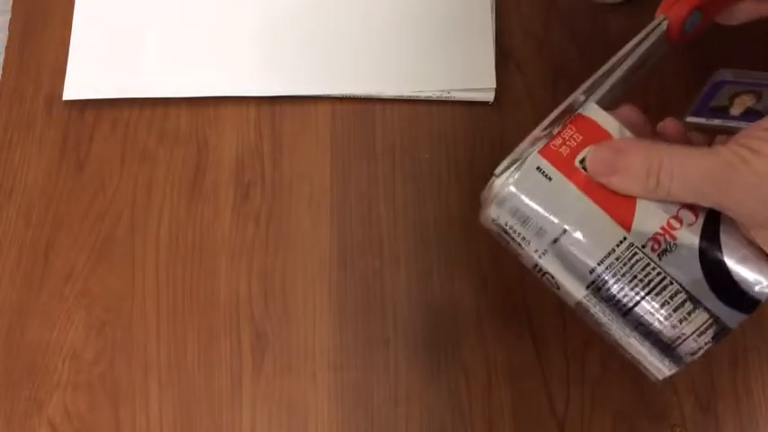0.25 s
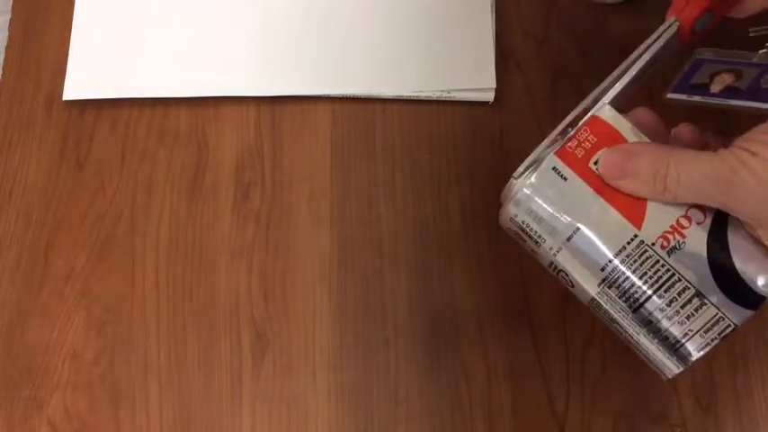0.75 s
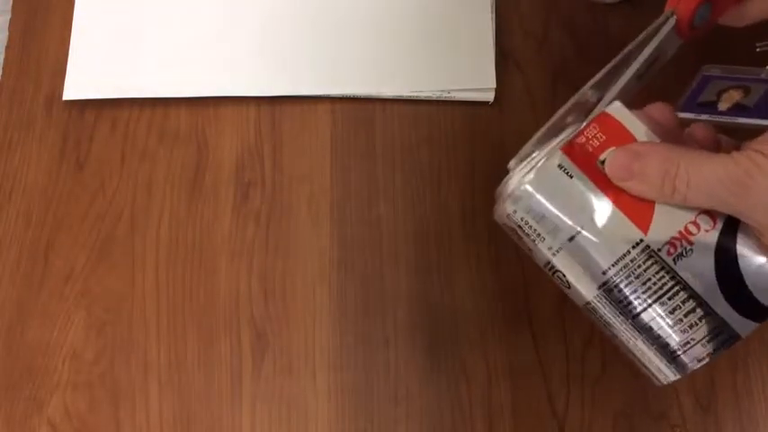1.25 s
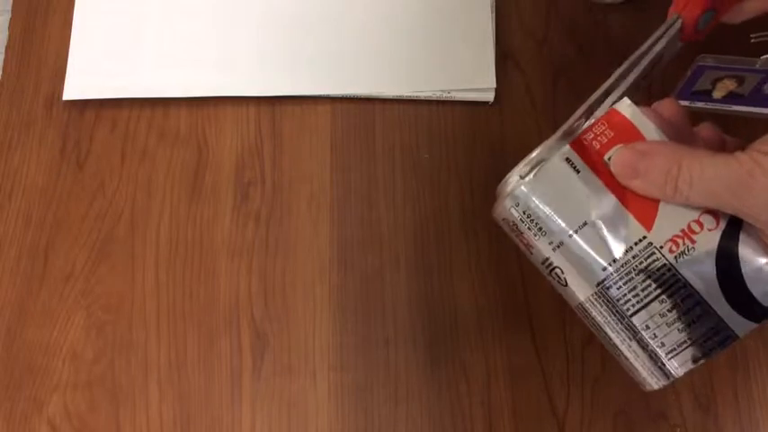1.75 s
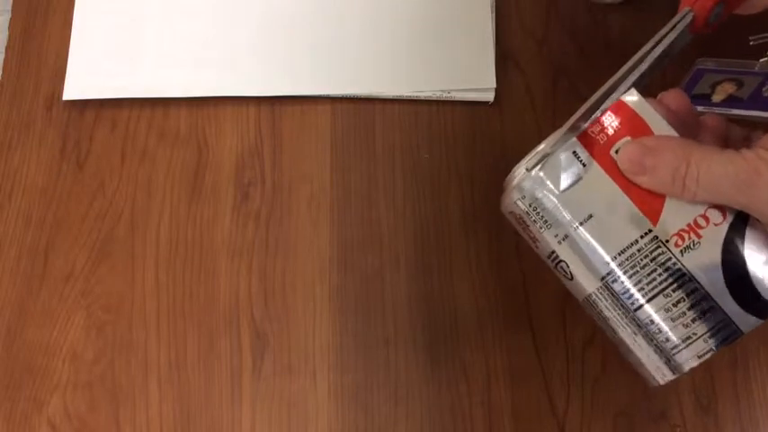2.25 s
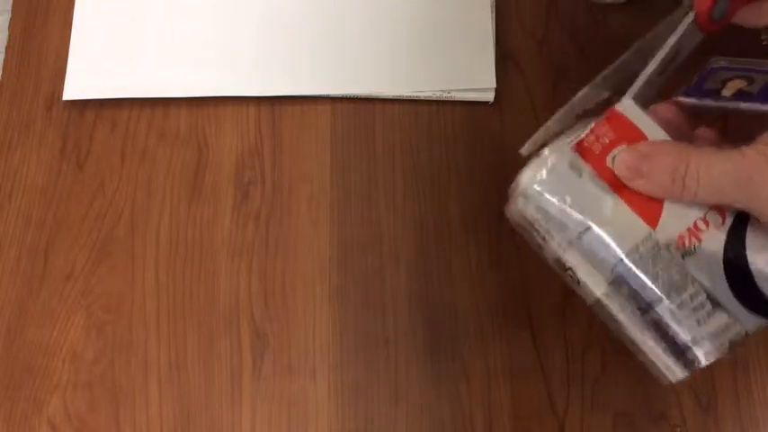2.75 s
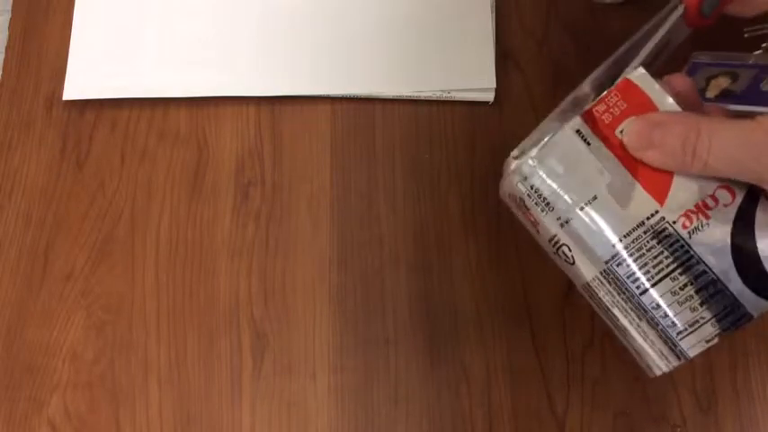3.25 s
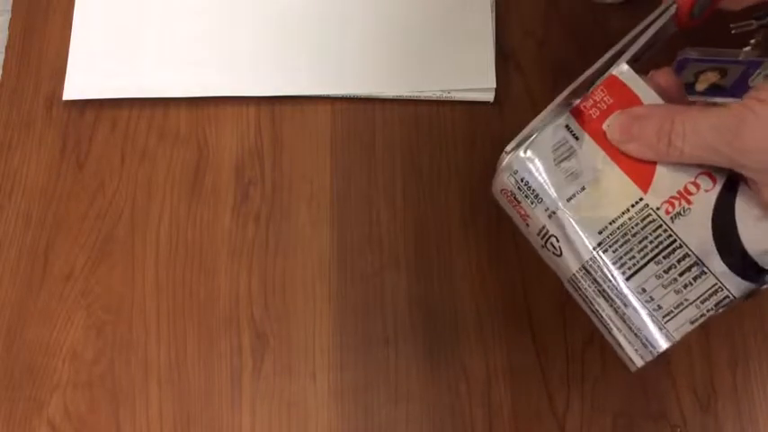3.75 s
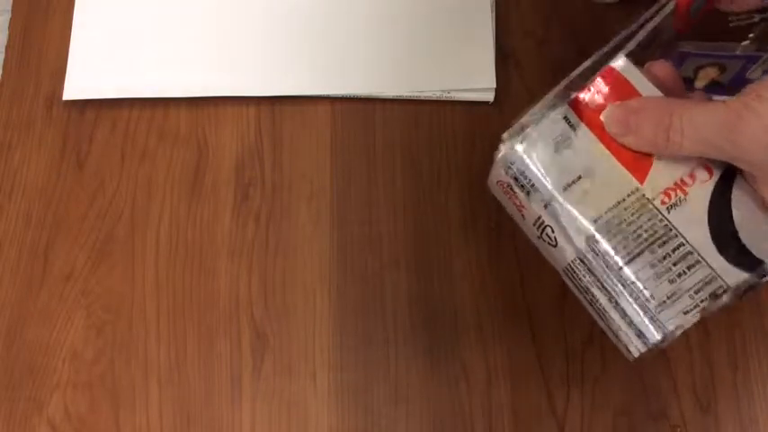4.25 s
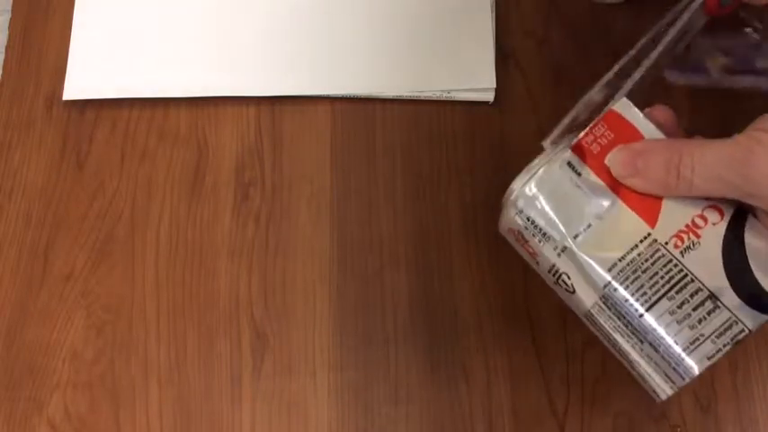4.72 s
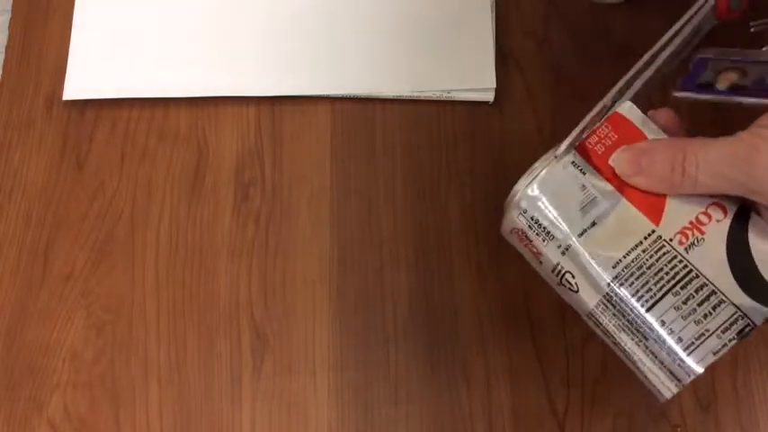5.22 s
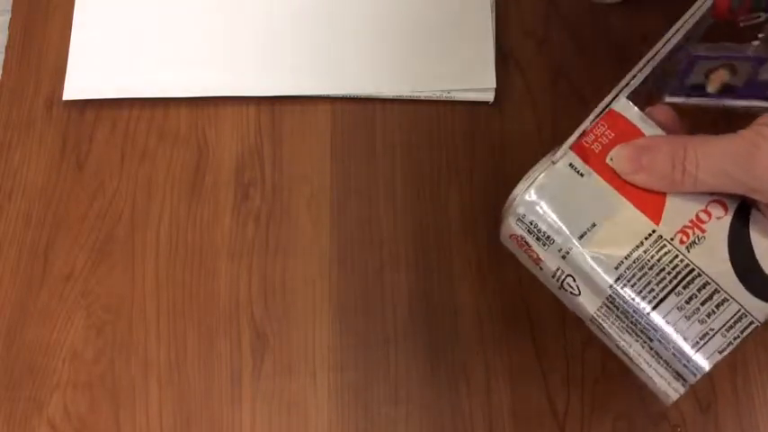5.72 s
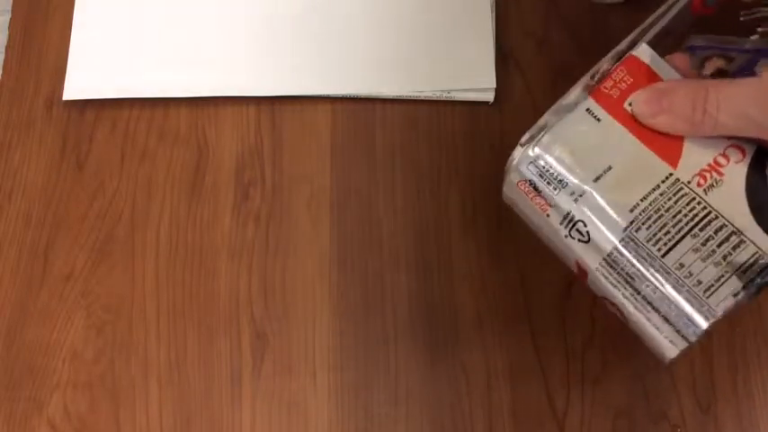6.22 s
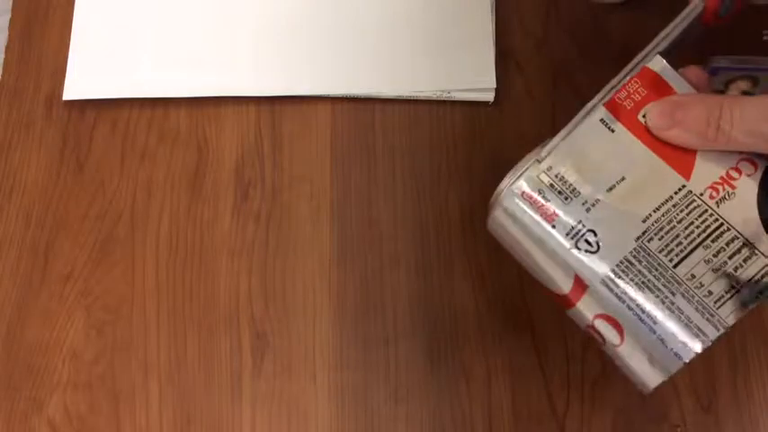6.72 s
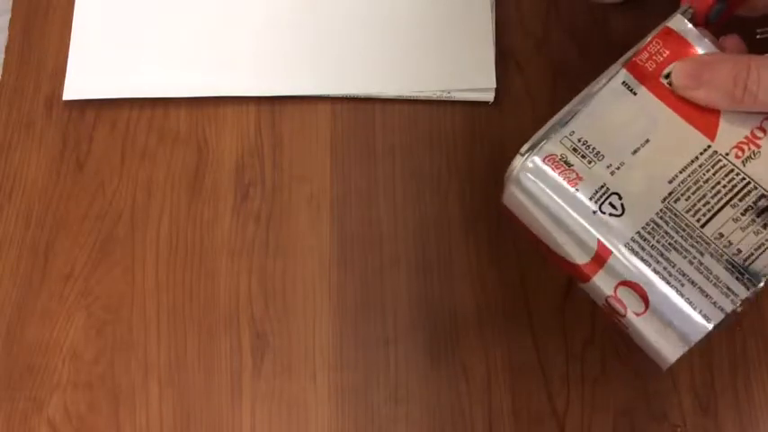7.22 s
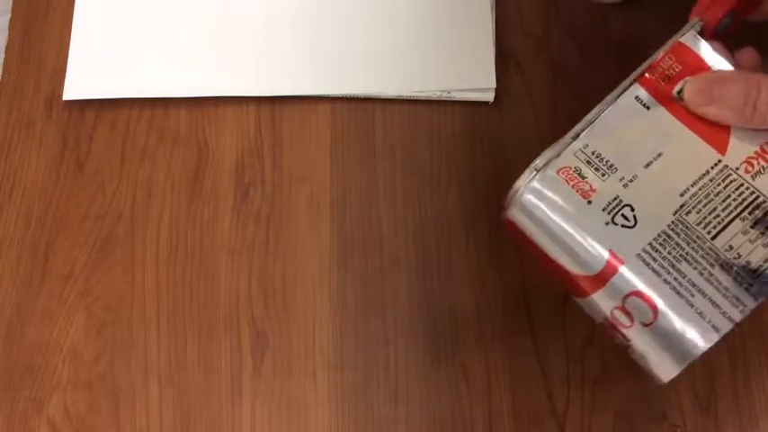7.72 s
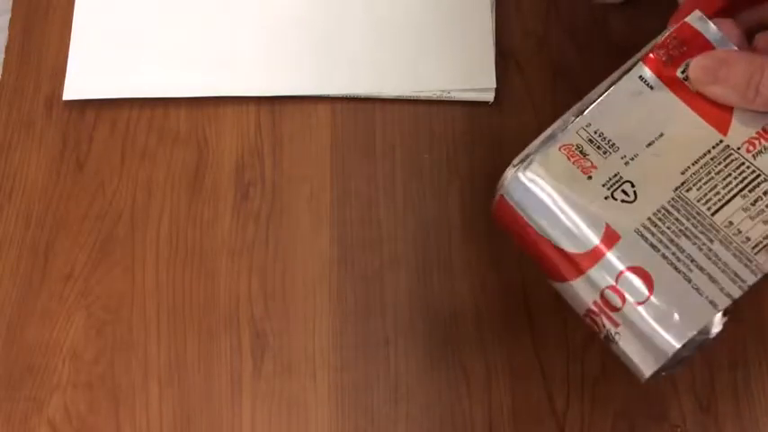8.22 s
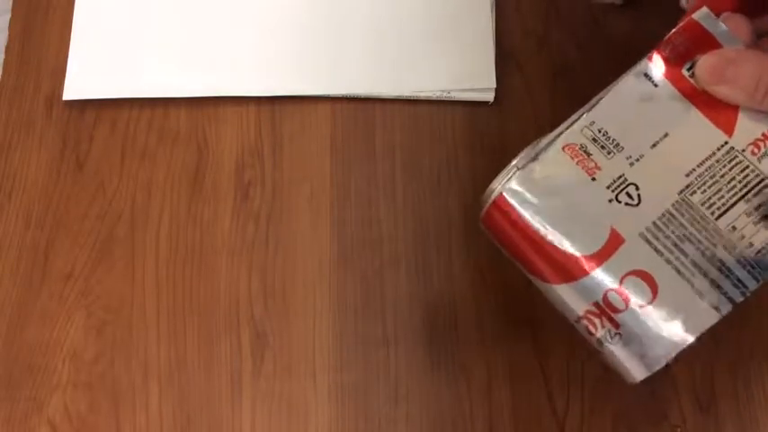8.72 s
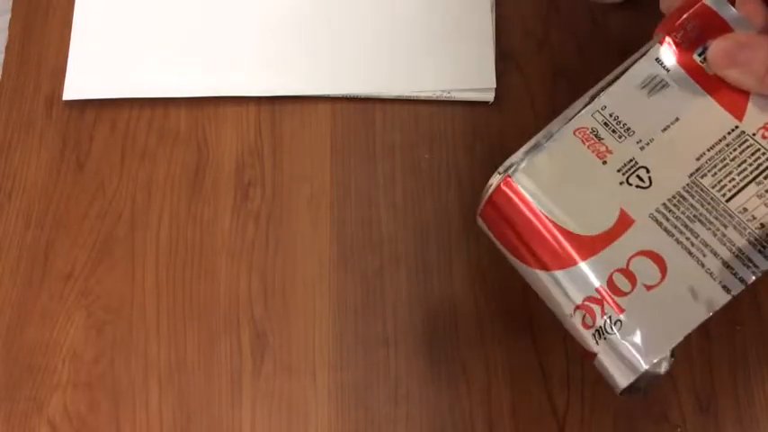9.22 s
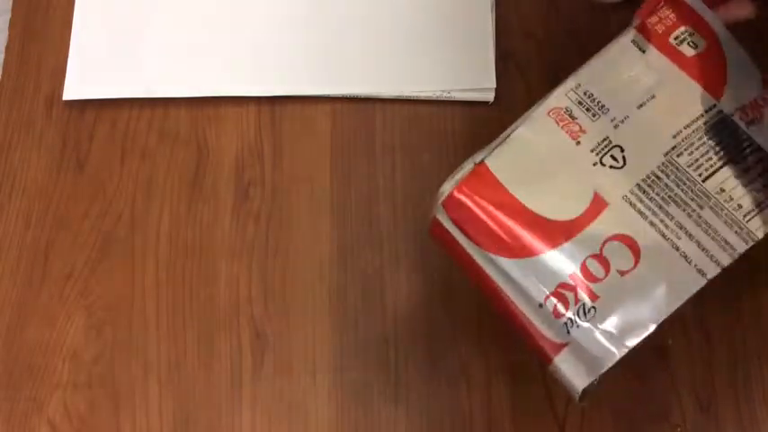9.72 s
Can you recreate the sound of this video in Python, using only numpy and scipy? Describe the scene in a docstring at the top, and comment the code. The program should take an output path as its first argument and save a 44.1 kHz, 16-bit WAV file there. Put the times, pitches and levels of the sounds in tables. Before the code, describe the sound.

Scissors cut a thin aluminium drink can, heard close up in a quiet room over a faint, steady ventilation rumble. Each cut is a sharp metallic snap with a brief crackle and a hollow, tinny ring. After a few tiny ticks, a loud snap comes at 0.6 seconds, followed by soft crinkles. More strong snaps land at about 2.3, 2.7, 3.7, 4.4, 5.6 and 6.6 seconds, with weaker buckling pops, blade ticks and short scrapes scattered between them. From about 7 seconds the hollow tone rises slightly, and the cuts become longer, duller crunches with more rasping, clustering around 7.6, 8.4, 8.8 and 9.4 seconds. One more sharp snap comes near 9.8 seconds. The wooden table adds soft, dull thuds under the cuts, with low bumps near 2.3, 6.6 and 7.6 seconds.

```python
"""Scissors cutting a drink can

Scissors work round a thin aluminium can held over a wooden table in a quiet room. The sheet tears
and buckles in snaps; the blades scrape and tick along the cut edge. These forces sound the sheet, the
air hollow of the open can and the table, which the hand also jolts. Ventilation rumbles below."""
import sys
import numpy as np
from scipy import signal
from scipy.fft import rfft, irfft
from scipy.io import wavfile
from scipy.ndimage import uniform_filter1d

SR = 44100
rng = np.random.default_rng(int(sys.argv[2]) if len(sys.argv) > 2 else 0)


def generate_wav(sig):
    """Save sig (samples, or channels by samples) to the path in sys.argv[1] as 16-bit PCM at SR."""
    pcm = np.round(np.clip(np.atleast_2d(sig).T, -1, 1) * 32767).astype(np.int16)
    wavfile.write(sys.argv[1], SR, pcm)


N = 439677

# Snaps of the sheet: break_s, sheet_db, hollow_db, thud_db, hollow_pitch_hz, flap_pitch_hz
SNAPS = [(0.034, -59.5, -76, -65, 855, 6400), (0.144, -80, -66.0, -66, 990.0, 3100.0),
         (0.172, -79, -63, -75, 990.0, 3160), (0.221, -66, -67, -71, 940, 2650.0),
         (0.444, -79, -68, -72.0, 960, 3100), (0.609, -17, -32.5, -63, 1236, 6280),
         (1.17, -43.5, -51.5, -56.5, 1022, 5150), (1.19, -51.5, -50.5, -68, 1030, 4350.0),
         (1.47, -60.0, -59.5, -63, 1320.0, 4000.0), (1.531, -78.0, -60.5, -79, 886, 3120),
         (1.551, -42, -60, -60, 1434, 3174), (1.663, -56.5, -52, -47.5, 923, 3800),
         (2.34, -29.0, -37.5, -32, 994, 6420), (2.654, -44, -48, -47.5, 1260, 4050),
         (2.714, -20, -27.5, -41, 1220, 3970), (2.789, -59, -59, -76, 965.0, 3100.0),
         (2.819, -57, -56, -70, 920, 5250.0), (2.881, -62, -59.5, -65, 1006, 3280),
         (2.965, -53, -62, -56, 1020, 3330), (2.982, -43, -65, -73, 1040, 4970),
         (3.008, -39.5, -64, -70.0, 1040, 4830), (3.025, -42.5, -67, -80, 1000, 4900),
         (3.065, -72, -64, -74, 1315.0, 3250.0), (3.094, -62.0, -56, -76, 1028, 5870),
         (3.248, -72.5, -66, -68, 985.0, 3050.0), (3.321, -59.5, -45.5, -60.5, 1003, 2200.0),
         (3.712, -24.0, -29.5, -62.5, 1150, 3340), (3.755, -45.5, -37.0, -46.0, 990, 4000),
         (3.841, -59, -43.5, -52, 995, 2750.0), (4.072, -61.5, -36.5, -53.5, 945, 2450),
         (4.271, -65.5, -47, -67.5, 1015.0, 2290), (4.385, -28.5, -25, -61, 1090, 4930),
         (4.407, -53.0, -37, -50, 976, 3170), (4.459, -69, -51, -60, 1030, 3120),
         (4.503, -77, -65.0, -67, 1025.0, 3860), (4.722, -78, -74, -73.5, 1010.0, 3400.0),
         (4.771, -73, -65.5, -64, 997, 2266), (4.934, -77.5, -59.5, -69.5, 1005, 3800.0),
         (4.965, -78, -61.5, -72, 1006, 2200.0), (5.33, -50.5, -39, -50.5, 1020, 2520),
         (5.347, -67.5, -51, -70.5, 1045.0, 2500.0), (5.391, -46.0, -36.5, -55, 963, 3600.0),
         (5.628, -27, -26, -34, 1034, 5220), (5.918, -68.5, -79.5, -68, 995, 3160),
         (5.926, -53.5, -53, -74, 1095.0, 3500.0), (6.025, -59.5, -55, -70, 1105.0, 3480),
         (6.046, -52, -47, -54, 940.0, 3310), (6.092, -61, -37, -79, 920, 2235),
         (6.245, -77, -61.0, -56, 960.0, 3150.0), (6.301, -49.5, -31, -71.5, 1096, 3930),
         (6.32, -72, -54.5, -72, 1048, 3900.0), (6.568, -66, -55.5, -58.5, 1206, 5350.0),
         (6.619, -34, -27, -36.5, 1116, 4460), (6.636, -36, -41, -42, 1110, 6500),
         (6.665, -53, -50, -50, 1250, 6600), (6.947, -47.5, -50.5, -52.5, 1107, 2740),
         (6.979, -42.5, -63, -54, 1231, 4380), (7.212, -64, -63, -64, 1113, 2800.0),
         (7.264, -65, -65.5, -63, 1217, 2160), (7.398, -79, -70.0, -51.5, 1030.0, 2160),
         (7.537, -76, -61.5, -66.5, 1050.0, 2870), (7.554, -50, -50.5, -51.5, 1200, 2560),
         (7.621, -41.5, -41.5, -35.5, 1400, 2800.0), (7.626, -37, -29.5, -56, 1238, 3220),
         (7.678, -58, -47.5, -47.5, 1290, 3950), (7.934, -52, -50.5, -50.5, 1220, 3900),
         (8.192, -59.5, -59, -62, 1045.0, 4250.0), (8.206, -56.5, -55.5, -52.5, 1490, 3000),
         (8.369, -41.5, -42, -41, 1295.0, 3830), (8.379, -44.0, -39, -40, 1335, 3700),
         (8.553, -66, -77, -73.5, 990, 5300), (8.79, -49, -49.5, -57, 1425.0, 4300.0),
         (8.822, -44.5, -52, -55.0, 1430.0, 2970), (8.839, -43, -37, -36, 1390, 2250),
         (8.924, -67, -55, -63, 1438, 4110), (9.189, -69, -62.5, -50.5, 1393, 4150.0),
         (9.351, -37, -36.5, -39.5, 1410, 3080), (9.382, -46, -54, -35, 1440, 4250),
         (9.413, -38.0, -36, -60, 890, 2680), (9.492, -62, -53.5, -55, 1420, 3020),
         (9.588, -64, -42.5, -45.5, 960, 2850), (9.845, -28.0, -35, -54, 1270, 4900)]
LEAD_SAMPLES = 20   # crackle starts ahead of the break


def can():
    """Cutting forces drive the air hollow, the sheet, the blades and the table."""
    scrape = scrape_forces()
    air, wall, treble, thud = snap_forces() + scrape + tick_forces()
    return hollow(air) + sheet(wall, treble) + blades(scrape[1]) + table_thud(thud)


def snap_forces():
    """Each snap is a break, a dying crackle and a longer shiver. Rows: hollow, sheet, treble, thud."""
    # Crackle lengthens and dulls as the strip comes free: time_s, t60_s, treble_re_sheet_db, break_db
    strip = [(0, 0.056, -3, 13), (2.4, .035, 0, 11), (4.4, 0.041, -1.5, 10.5), (6.0, 0.06, -2.5, 12.5),
             (7.6, 0.078, -3, 7), (9.97, 0.12, -5.5, 4)]
    strip_s, *strip_columns = np.transpose(strip)
    shiver_t60_s = np.array([[0.2], [0.2], [0.14], [0.2]])
    push_db = np.array([5.5, 0, 0, 5.5])   # the break shoves air and table hardest
    out, size = np.zeros((4, N + SR)), SR // 4
    t = np.arange(size) / SR
    for break_s, sheet_db, hollow_db, thud_db, _, _ in SNAPS:
        t60_s, tilt_db, break_db = (np.interp(break_s, strip_s, column) for column in strip_columns)
        pop_db = max(hollow_db - sheet_db, 0)   # a hollow pop is a soft buckle: duller, cleaner
        hard_db = max(sheet_db + 40, 0)   # hard snaps also break more cleanly
        treble_db = sheet_db + tilt_db - 0.35 * pop_db
        crackle = grains(size, per_s=9800, spread_db=5.5)
        crackle *= from_db(-60 * t / t60_s) * np.minimum(t / 0.0011, 1)
        finger_damping_db = 1.2 * wander(size, window=400)
        shiver = from_db(-16.5 - 60 * t / shiver_t60_s + finger_damping_db)
        bursts = crackle + rng.standard_normal(size) * shiver   # crumpled wall: new, dense modes
        bursts[:, LEAD_SAMPLES] += from_db(break_db + 0.16 * hard_db + 0.3 * pop_db + push_db)
        cut_hz = np.clip(19000 * 2 ** (-0.082 * pop_db), 500, 18000)
        bursts[1] = signal.lfilter(*signal.butter(2, cut_hz, fs=SR), bursts[1])
        bursts /= np.sqrt(np.mean(bursts[:, :SR // 100] ** 2, axis=1, keepdims=True))
        i = round(break_s * SR) - LEAD_SAMPLES
        out[:, i:i + size] += from_db([hollow_db, sheet_db, treble_db, thud_db])[:, None] * bursts
    return out[:, :N]


def scrape_forces():
    """A blade rasps on the burred edge under each stroke's pressure. Rows as in snap_forces."""
    # Blade strokes: full_pressure_s, closing_s, held_s, sheet_db, hollow_db, thud_db
    strokes = [(0.01, 0.06, 0.075, -63, -61, -66), (.175, 0.033, 0.059, -68.5, -57.5, -79),
               (1.178, 0.014, 0.09, -78, -66.5, -60), (1.47, .01, 0.29, -68, -65, -64),
               (2.646, .012, 0.027, -49.5, -48.5, -54), (2.98, 0.035, 0.029, -45, -57, -76),
               (3.12, 0.033, 0.19, -72.5, -72.5, -75), (4.719, 0.15, .27, -75.5, -69.5, -75),
               (6.053, 0.034, 0.012, -52, -43, -52.5), (6.977, 0.05, 0.043, -44.5, -54.5, -59),
               (7.222, 0.035, 0.022, -71, -65, -66.5), (7.556, .02, 0.015, -62, -59.5, -62),
               (7.947, 0.017, 0.047, -49.5, -45.5, -46.5), (8.202, 0.041, 0.0041, -64, -65.5, -58),
               (8.386, 0.028, 0.026, -48.5, -46, -40.5), (8.794, 0.0084, 0.19, -54, -53, -52.5),
               (9.164, 0.017, 0.1, -72, -68.5, -77), (9.359, 0.013, 0.017, -55.5, -39, -42.5),
               (9.426, 0.065, 0.0041, -45, -39, -44.5), (9.601, 0.022, 0.15, -44.5, -49.5, -47.5),
               (9.842, 0.12, .005, -48.5, -62, -55), (9.853, 0.011, 0.007, -35, -39, -52),
               (9.91, 0.022, 0.092, -93, -77, -66)]
    closing_db, sag_db_per_s, release_db_per_s = 30, 88.5, 378
    out, t = np.zeros((4, N)), np.arange(N) / SR
    burrs_db = 2.2 * wander(N, window=150)
    rasp = rms_one(grains(N, per_s=8000, spread_db=2.5) * from_db(burrs_db))
    for full_s, closing_s, held_s, sheet_db, hollow_db, thud_db in strokes:
        on = abs(t - full_s) < 0.5
        age_s = t[on] - full_s
        pressure = from_db(closing_db / closing_s * np.minimum(age_s, 0)
                           - sag_db_per_s * np.clip(age_s, 0, held_s)
                           - release_db_per_s * np.maximum(age_s - held_s, 0))
        treble_db = sheet_db - 4 - 0.19 * (sheet_db + 38)   # lighter strokes are brighter
        out[:, on] += from_db([hollow_db, sheet_db, treble_db, thud_db])[:, None] * pressure
    return out * rasp


def tick_forces():
    """The blades bite or slip in brief bursts of grains. Rows as in snap_forces."""
    # Faint blade ticks: start_s, level_db
    ticks = [(0.585, -63.5), (0.597, -58), (0.945, -77.5), (3.611, -63), (3.692, -67.5), (3.703, -56),
             (4.284, -64), (4.361, -65), (4.374, -64.5), (4.847, -77), (4.864, -66.5), (4.991, -67),
             (5.383, -48), (5.619, -47.5), (6.612, -43), (7.92, -78), (8.352, -76)]
    out, size, t60_s = np.zeros(N), SR // 50, 0.033
    decay_db = 60 * np.arange(size) / SR / t60_s
    for start_s, level_db in ticks:
        i = round(start_s * SR)
        out[i:i + size] += grains(size, per_s=18000, spread_db=2.5) * from_db(level_db - decay_db)
    return out * from_db([[0.5], [0], [-2], [-12]])


def sheet(wall, treble):
    """The thin wall radiates broadband crackle, a flap resonance and two longer rings."""
    # Wall spectrum: freq_hz, density_db
    spectrum = [(940, -38), (1600, -14), (1810, -8.5), (2380, -9), (3080, -1.5), (4400, -2), (5130, -3),
                (6530, -1), (7620, -2.5), (9880, -6), (14100, -15.5), (15500, -24), (16000, -33.5)]
    # Rings that outlast the crackle: freq_hz, level_db, t60_s
    ring_modes = [(3010, -4.5, 0.085), (6000, -1.5, 0.13)]
    # Free flap beside the cut: pitch_ratio, width_hz, level_db
    flap_modes = [(1.0, 200, -7)]
    # Flap at rest: time_s, pitch_hz
    flap_rest = [(0, 3133), (9.97, 3126)]
    crossover_hz = 7000
    body = through(wall, response(spectrum, hi_hz=crossover_hz))
    sizzle = through(treble, response(spectrum, lo_hz=crossover_hz))
    flap = resonate(wall, flap_modes, flap_rest, pitch_column=5, cut_hz=9000)
    return body + sizzle + flap + through(wall, ringing(ring_modes, level_db=-24))


def hollow(force):
    """The air in the open can resonates at a pitch set by the can's shape."""
    # Air modes: pitch_ratio, width_hz, level_db
    modes = [(0.767, 150, -3.5), (0.999, 161.1, 7.5), (1.079, 88.85, -8), (1.28, 161.6, -10),
             (1.6, 600, -14.5)]
    # Hollow at rest: time_s, pitch_hz
    rest = [(0, 997), (6.4, 1022), (7.0, 1233), (8.2, 1300), (8.8, 1310), (9.97, 1377)]
    return resonate(force, modes, rest, pitch_column=4, cut_hz=2260)


def resonate(force, modes, rest, pitch_column, cut_hz):
    """Resonances jump to each snap's pitch, then back to rest as the can springs into shape."""
    # The cut opens the can and damps it: time_s, width_factor
    opening = [(0, 1.1), (8.2, 0.83), (9.0, 3.44), (9.97, 3.4)]
    settle_s, lead_s = 0.035, LEAD_SAMPLES / SR
    force = signal.sosfilt(signal.butter(2, cut_hz, fs=SR, output="sos"), force + 1e-18)
    pitches = [(0.0039, rest[0][1])]   # start_s, pitch_hz
    breaks_s = [snap[0] for snap in SNAPS]
    for snap, break_s, next_s in zip(SNAPS, breaks_s, breaks_s[1:] + [N / SR]):
        pitches.append((break_s - lead_s, snap[pitch_column]))
        if break_s + settle_s < next_s - lead_s:
            pitches.append((break_s + settle_s, np.interp(break_s, *np.transpose(rest))))
    edges = [round(start_s * SR) for start_s, _ in pitches] + [N]
    out = np.zeros(N)
    for k, (ratio, width_hz, level_db) in enumerate(modes):
        state = np.zeros(2)
        for (start_s, pitch_hz), i, j in zip(pitches, edges, edges[1:]):
            radius = np.exp(-np.pi * width_hz * np.interp(start_s, *np.transpose(opening)) / SR)
            b = np.sqrt((1 - radius ** 2) / 2) * np.array([1, 0, -1])   # unit noise gain
            a = [1, -2 * radius * np.cos(2 * np.pi * ratio * pitch_hz / SR), radius ** 2]
            part, state = signal.lfilter(b, a, force[i:j], zi=state)
            out[i:j] += (-1) ** k * from_db(level_db) * part
    return out


def blades(friction):
    """The blades ring briefly under friction."""
    # Blade modes: freq_hz, level_db, t60_s
    modes = [(2980, -8, 0.009), (4160, 6.5, 0.02), (5280, 1.5, .025), (7090, -3.5, 0.016),
             (10100, 3, 0.018)]
    return through(friction, ringing(modes, level_db=-7))


def table_thud(force):
    """The wooden table answers the cutting with a dull thud."""
    # Thud spectrum: freq_hz, density_db
    spectrum = [(22, -22), (50, -13.5), (100, -7), (200, -5.5), (350, 5), (550, -2), (720, 3), (1100, -14),
                (1600, -50)]
    return through(force, response(spectrum))


def table_bumps():
    """The hand jolts the table top into a low, quickly damped swing."""
    # Jolts: start_s, peak_db
    jolts = [(2.34, -49.5), (6.62, -48), (7.63, -42), (8.379, -59)]
    pitch_hz, t60_s = 101, 0.21
    out, t = np.zeros(N), np.arange(N) / SR
    for start_s, peak_db in jolts:
        age_s = np.maximum(t - start_s, 0)
        out += from_db(peak_db - 60 * age_s / t60_s) * np.sin(2 * np.pi * pitch_hz * age_s)
    return out


def room_and_hollow_tail(direct):
    """Short room reflections, plus the can's hollow ringing on near 1 kHz."""
    # Tail bands: centre_hz, t60_s, level_db
    bands = [(306, 0.033, -5.5), (1080, 1, -23), (3000, 0.33, -16.5), (6360, 0.36, -16.5),
             (11100, 0.23, -9), (14500, .22, -16.5)]
    t = np.arange(SR // 2) / SR
    white, impulse = rng.standard_normal(len(t)), 0
    centres_hz = [band[0] for band in bands]
    edges_hz = [60, *np.sqrt(np.multiply(centres_hz[1:], centres_hz[:-1])), 18000]
    for (_, t60_s, level_db), lo_hz, hi_hz in zip(bands, edges_hz, edges_hz[1:]):
        noise = signal.sosfilt(signal.butter(3, [lo_hz, hi_hz], "band", fs=SR, output="sos"), white)
        energy_norm = np.sqrt(2 * np.log(1000) / (t60_s * SR))
        impulse += noise * from_db(level_db - 60 * t / t60_s) * energy_norm
    return through(direct, impulse * np.clip(t / 0.016, 0, 1))


def ventilation():
    """Steady ventilation rumble; a faint, even hiss sounds alongside it."""
    # Room tone spectrum: freq_hz, density_db
    spectrum = [(15, -69.5), (25, -38.5), (102, -6), (141, -7.5), (256, -9.5), (309, -15), (427, -12.5),
                (607, -16.5), (659, -14.5), (775, -18), (1260, -24.5), (1480, -27), (4250, -35),
                (14800, -41), (16000, -54)]
    gain = from_db(at_hz(spectrum, np.arange(N // 2 + 1) * SR / N))
    return from_db(-64) * rms_one(irfft(rfft(rng.standard_normal(N)) * gain, N))


def grains(count, per_s, spread_db):
    """Tiny fractures of uneven size at random moments; rms 1."""
    size_draw, sign_draw, time_draw = rng.random((3, count))
    sizes = from_db(spread_db * np.minimum(-np.log(size_draw + 1e-9), 4))
    return rms_one(sizes * np.sign(sign_draw - 0.5) * (time_draw < per_s / SR))


def wander(count, window):
    """Noise smoothed over window samples; rms 1."""
    return rms_one(uniform_filter1d(rng.standard_normal(count), size=window))


def ringing(modes, level_db):
    """Impulse response of decaying modes; energy set by level_db."""
    t = np.arange(SR // 3) / SR
    impulse = sum(from_db(db - 60 * t / t60_s) * np.sin(2 * np.pi * hz * t) for hz, db, t60_s in modes)
    return from_db(level_db) * impulse / np.linalg.norm(impulse)


def response(spectrum, lo_hz=0, hi_hz=SR):
    """Minimum-phase impulse response of a spectrum between two edges; energy 1."""
    hz = np.arange(2049) * SR / 4096
    below_oct = np.clip(np.log2((lo_hz + 1) / (hz + 1)), 0, 2)
    above_oct = np.clip(np.log2((hz + 1) / hi_hz), 0, 2)
    cepstrum = irfft(np.log(from_db(at_hz(spectrum, hz) - 48.34 * (below_oct + above_oct))))
    cepstrum[1:2048] *= 2
    cepstrum[2049:] = 0
    impulse = irfft(np.exp(rfft(cepstrum)))
    return impulse / np.linalg.norm(impulse)


def at_hz(spectrum, hz):
    """Level in dB on a log frequency axis; -60 outside the table."""
    freq_hz, db = np.transpose(spectrum)
    return np.interp(np.log(hz + 1), np.log(freq_hz), db, left=-60, right=-60)


def through(x, impulse):
    """Causal convolution."""
    return signal.oaconvolve(x, impulse)[:N]


def from_db(db):
    """Decibels to gain."""
    return 10 ** (np.asarray(db) / 20)


def rms_one(x):
    """Scale to rms 1."""
    return x / np.sqrt(np.mean(x ** 2) + 1e-20)


def scene():
    """Can, its tail, table bumps and ventilation; mono."""
    direct = can()
    return (direct + room_and_hollow_tail(direct) + table_bumps() + ventilation())[None]


def record(dry):
    """Clip at full scale; low-pass with the stopband from 16.9 kHz."""
    return signal.sosfilt(signal.cheby2(14, 85, 16900, fs=SR, output="sos"), np.clip(dry, -1, 1))


dry = scene()
out = record(dry)
generate_wav(out)
```